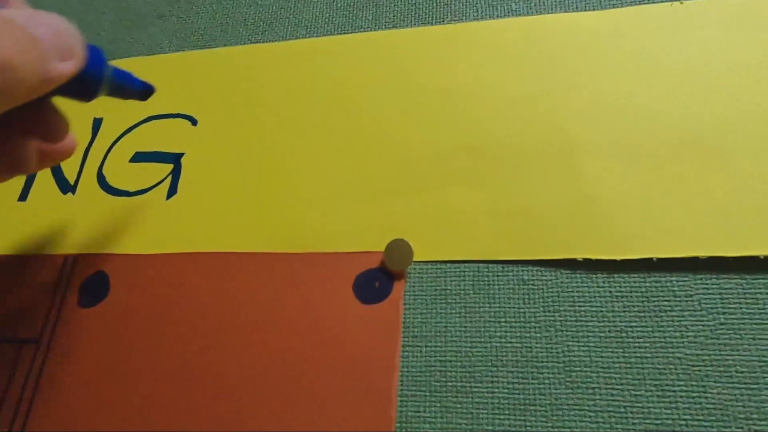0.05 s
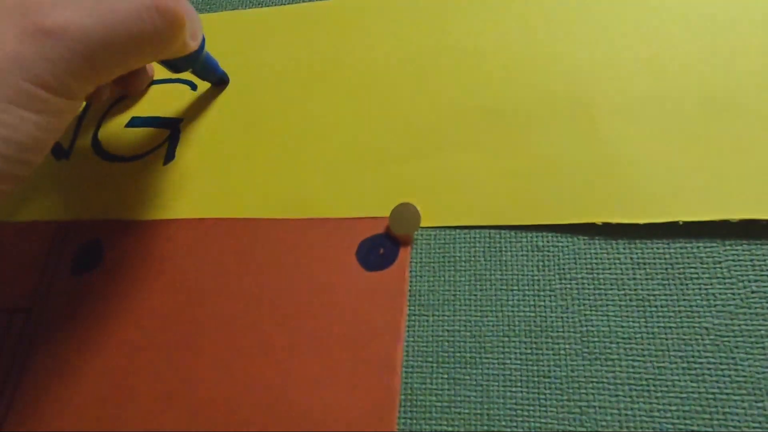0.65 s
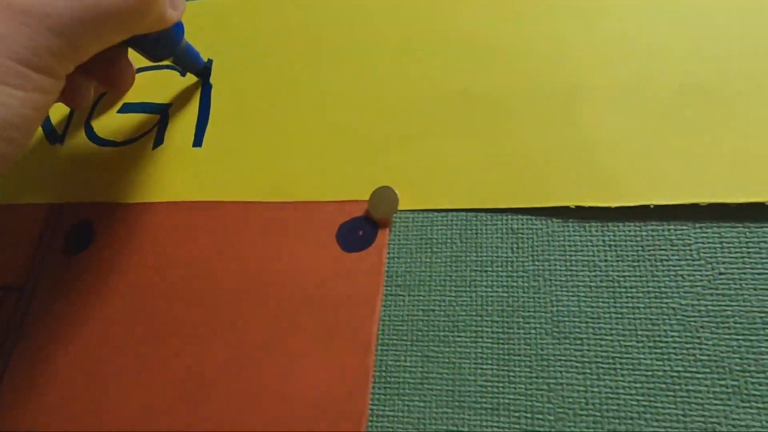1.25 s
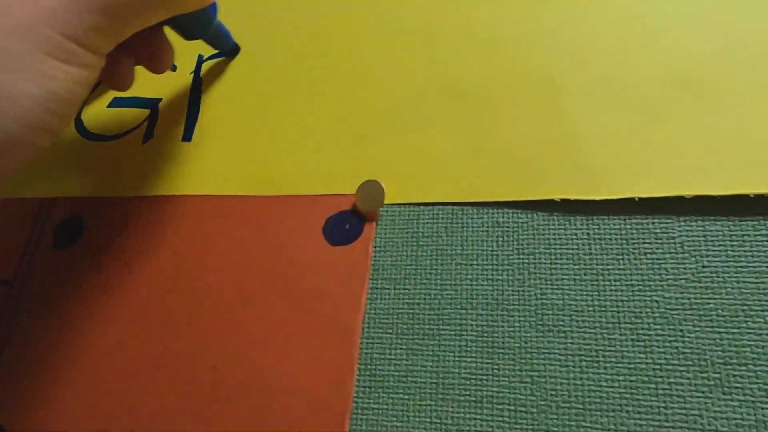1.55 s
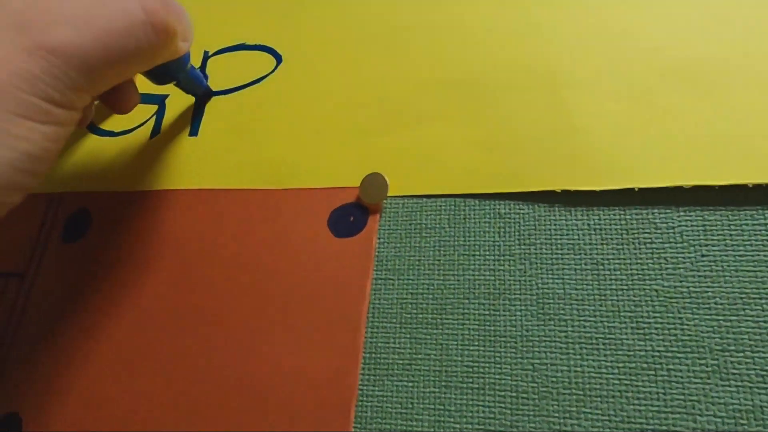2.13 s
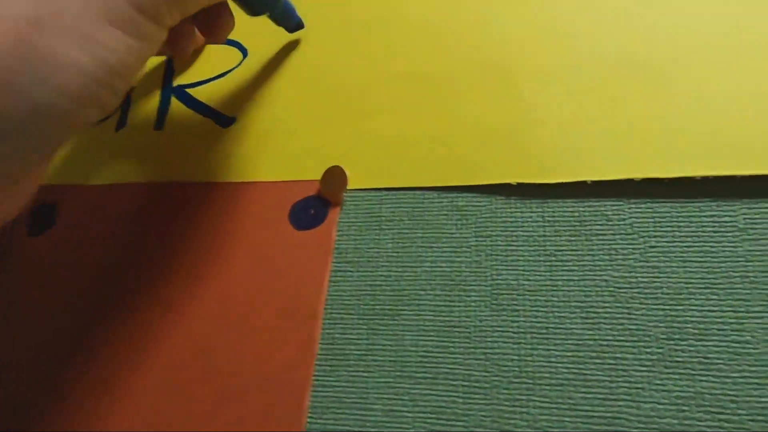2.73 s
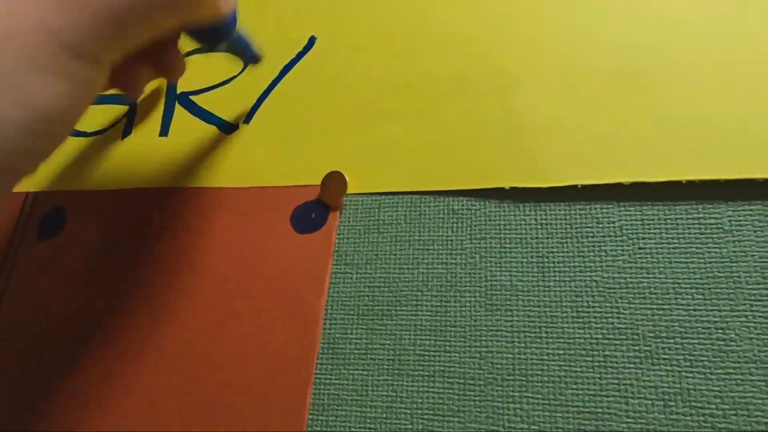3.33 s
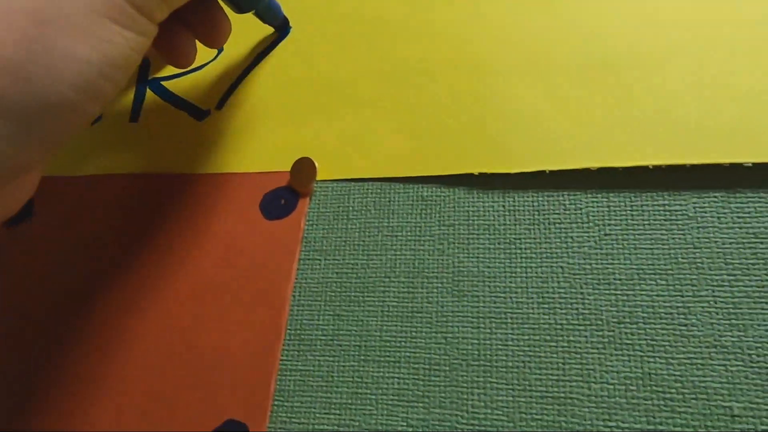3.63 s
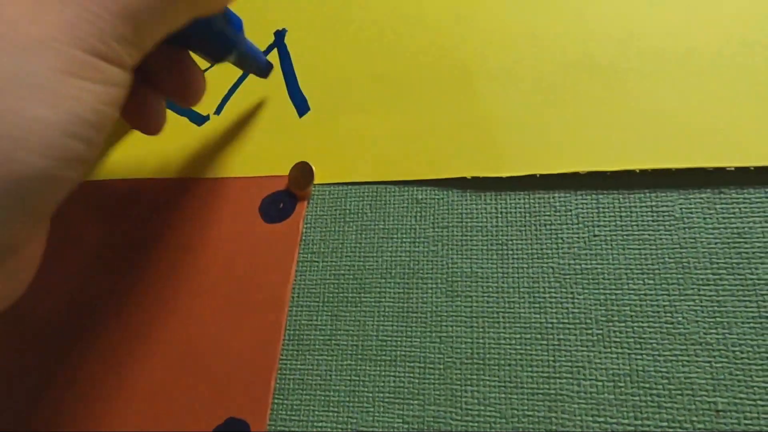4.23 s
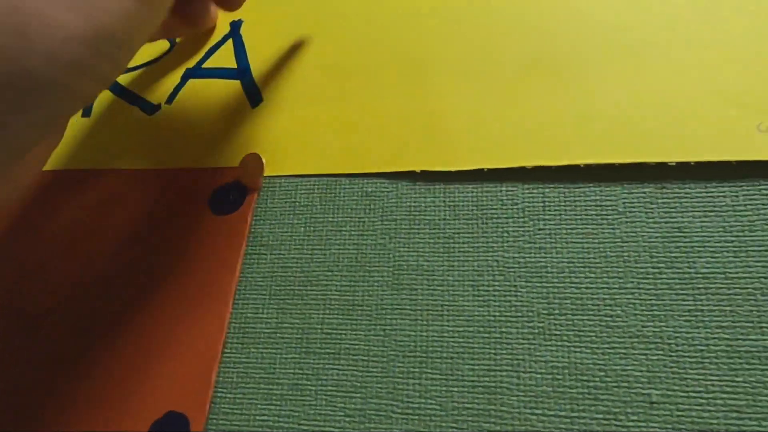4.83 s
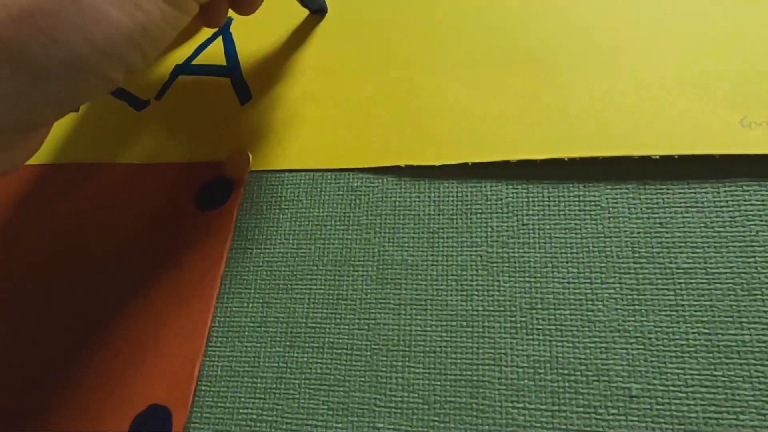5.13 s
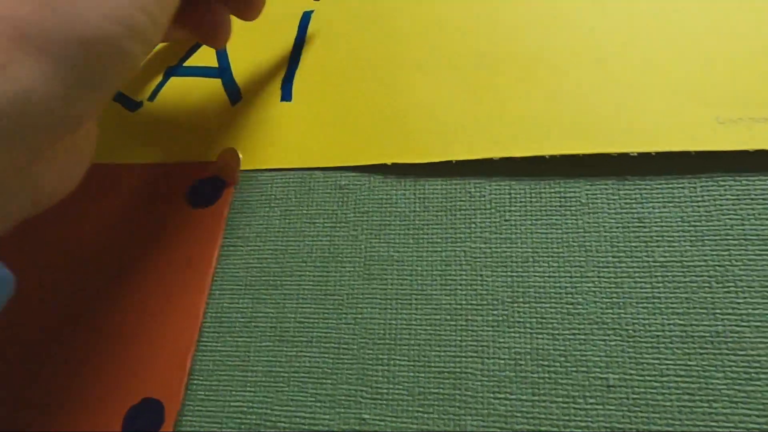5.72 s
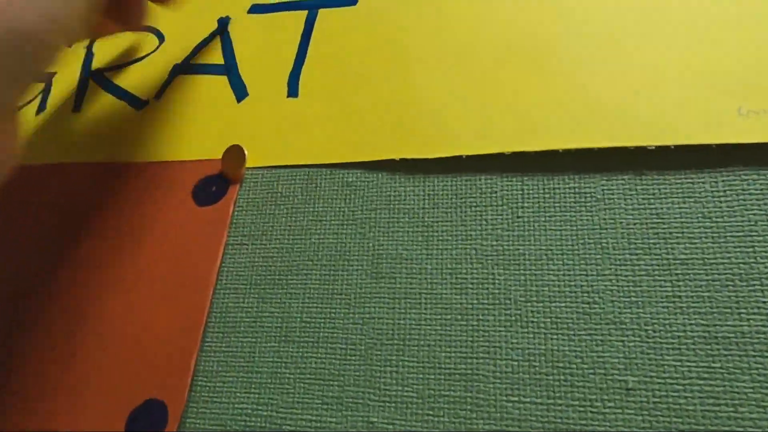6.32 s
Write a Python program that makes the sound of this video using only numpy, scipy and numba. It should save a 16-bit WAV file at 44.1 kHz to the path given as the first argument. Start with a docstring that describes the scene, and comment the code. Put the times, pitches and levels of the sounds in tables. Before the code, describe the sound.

A felt marker writes on card pinned to a cloth-covered board, close to the microphone. After a faint brush of hand and sleeve, nine short, high, scratchy strokes follow at an uneven pace, some of them squeaky. Soft, dull knocks sound as the pen lands, with tiny ticks in the pauses. A sleeve rubs near the end, and a low rumble fills the quiet room throughout.

```python
"""In a quiet room, a felt marker writes capital letters on card pinned to a cloth-covered board.
Each landing is an impact that excites the modes of the board. Each stroke is stick-slip friction:
a stream of tiny slips drives resonances that shift as the nib travels. Between strokes the nib ticks,
the hand brushes the card and a sleeve rustles, over a low room rumble."""
import sys
import numpy as np
from scipy import signal
from scipy.fft import rfft, irfft
from scipy.io import wavfile
from numba import njit

SR = 44100
rng = np.random.default_rng(int(sys.argv[2]) if len(sys.argv) > 2 else 0)


def generate_wav(signal):
    """Clip the signal to [-1, 1] and save it as 16-bit WAV at the path in sys.argv[1]."""
    frames = np.transpose(np.atleast_2d(signal))
    scaled = np.clip(frames, -1, 1) * 32767
    pcm = np.round(scaled).astype(np.int16)
    wavfile.write(sys.argv[1], SR, pcm)


N = 280917
TIME = np.arange(N) / SR
FREQS = np.maximum(np.fft.rfftfreq(N, 1 / SR), 1)

# Strokes of the nib. Motion: start t/s, end t/s, fastest point/share of stroke, slow start/dB, braking/dB;
# level/dB: main resonance, low resonance, its growth, high resonance, fixed ring, sheet rasp, fibre hiss,
#   squeak over rasp;
# f/Hz: low resonance at start, at end, main, high, antiresonance at start, at end, upper antiresonance
STROKE_TABLE = [ (0.749, 1.115, 0.51, 10.3, 28.4, -33, -40.5, -7.5, -33, -50, -42, -39.5, 6, 3910, 4000, 4800, 5940, 5330, 5630, 8300),
                (1.536, 1.866, 0.73, 12.8, 16, -34, -36, 10, -37.5, -44.5, -39, -39.5, -5, 2640, 3320, 4480, 6770, 3150, 3400, 6600),
                (1.865, 2.212, 0.62, 1.8, 35, -39.5, -37, 2, -43.5, -55, -39.5, -45, -0.5, 3600, 3740, 4700, 6800, 4300, 4320, 6600),
                (2.327, 2.591, 0.75, 12.7, 35, -27.5, -34, 4.5, -34.5, -61, -39, -35.5, 2.5, 3540, 3130, 4660, 7370, 4270, 4250, 7000),
                (3.088, 3.377, 0.7, 8.2, 44, -33, -37.5, 11, -36.5, -52, -40.5, -40, -6, 3580, 3420, 4870, 6980, 4120, 4700, 6900),
                (3.835, 4.157, 0.8, 9.7, 44, -33, -33.5, 6.5, -36.5, -44.5, -44, -36, -5, 4050, 3020, 5100, 6400, 3600, 3340, 7500),
                (4.594, 4.735, 0.38, 16, 17, -38, -40, 10, -39.5, -55, -40.5, -38, -5, 3350, 3320, 4750, 7660, 4020, 3950, 7150),
                (5.27, 5.562, 0.56, 9.1, 29, -36, -35, 9.5, -32, -45, -43, -36.5, -8, 4120, 3770, 5030, 5650, 3440, 3500, 6940),
                (6.107, 6.402, 0.43, 8.9, 15, -32, -42, -13, -42, -46.5, -38, -37.5, 1, 2960, 2820, 4440, 7160, 3800, 3630, 6900),
                ]
# Landings of the pen: t/s, strength/dB, time constant of the push/s, hand weight/dB, nib tick level/dB
LANDINGS = [(0.6797, -11, 0.00035, -8.5, -35), (1.4188, -12, 0.00023, -11, -49),
            (2.615, -28, 0.00039, -11, -52), (3.0102, -22, 0.00043, 13, -58),
            (3.7494, -10.5, 0.00032, 9.5, -37), (4.5331, -13.5, 0.00038, 12, -41),
            (5.2289, -9, 0.00061, 12.5, -34), (6.0324, -9, 0.00062, 14.5, -48)]
# Left-right coherence of nearby sources: f/Hz, coherence
NEAR_COHERENCE = [(100, .97), (1000, .92), (4000, .92), (8000, .85), (13000, .74)]


def from_db(db):
    """Amplitude ratio of a level in decibels."""
    return 10 ** (np.asarray(db) / 20)


def unit_power(x):
    """Normalisation to a mean square of one."""
    return x / np.sqrt(np.mean(x ** 2) + 1e-20)


def at_freqs(points):
    """Interpolation of (f/Hz, value) points on a logarithmic frequency axis."""
    hz, value = np.transpose(points)
    return np.interp(np.log(FREQS), np.log(hz), value)


def colour(x, spectrum):
    """Spectral shaping by (f/Hz, relative level/dB) points, at unit power."""
    return unit_power(irfft(rfft(x) * from_db(at_freqs(spectrum)), N))


def stereo_noise(coherence=NEAR_COHERENCE):
    """Partial coherence: left and right are the sum and difference of two white noises."""
    mid, side = rfft(rng.standard_normal((2, N)))
    alike = np.clip(at_freqs(coherence), 0, 1)
    return unit_power(irfft(np.sqrt(1 + alike) * mid + np.sqrt(1 - alike) * side * [[1], [-1]], N))


def drift(rate_hz):
    """Random modulation: low-passed noise of unit power."""
    return unit_power(irfft(rfft(rng.standard_normal(N)) / (1 + (FREQS / rate_hz) ** 2), N))


@njit
def resonator(x, angle, radius):
    """Two-pole resonance with a moving centre, given as an angle in radians per sample."""
    y = np.zeros_like(x)
    for c in range(2):
        for i in range(2, x.shape[1]):
            feedback = 2 * radius * np.cos(angle[i]) * y[c, i - 1] - radius * radius * y[c, i - 2]
            y[c, i] = x[c, i] - x[c, i - 2] + feedback
    return y


def resonate(x, hz, width_hz):
    """Two equal resonances in cascade give steep skirts; unit power."""
    angle = 2 * np.pi * hz / SR * np.ones(x.shape[1])
    radius = np.exp(-np.pi * width_hz / SR)
    return unit_power(resonator(resonator(np.ascontiguousarray(x), angle, radius), angle, radius))


def add(out, s, sound):
    """Superposition of a short sound starting at s seconds."""
    start = max(round(s * SR), 0)
    out[..., start:start + sound.shape[-1]] += sound[..., :max(N - start, 0)]


def background(rumble_db, air_db):
    """Ambient noise: a low rumble, modulated most in its deepest band, and a steady rush of air."""
    # Swells and lulls of the rumble: t/s, half-width/s, level change/dB
    swells = [(0.3, 0.45, 2.5), (2.2, 0.38, -5.5), (2.86, 0.077, 10.5)]
    # Spectra of the rumble and of the air: f/Hz, relative level/dB
    rumble_spectrum = [(18, -30), (28, 6), (39, 1), (53, 2.5), (80, 4), (100, -15), (122, -0.5), (160, -4),
                       (215, 2), (260, -6), (320, -11), (420, -18), (600, -21), (900, -27), (2000, -81),
                       (5000, -110)]
    air_spectrum = [(500, 2.5), (750, -13), (1000, 10.5), (1280, 11.5), (1700, 5), (2300, -1), (3200, -8),
                    (5000, -14.5), (7500, -14.5), (9000, -24), (12000, -28), (15500, -39)]
    # Left-right coherence of the room's noise: f/Hz, coherence
    coherence = [(60, .99), (300, .94), (1400, .87), (3100, .6), (7000, .3)]
    swell_db = sum(db * np.exp(-((TIME - s) / width_s) ** 2) for s, width_s, db in swells)
    noise = colour(stereo_noise(coherence), rumble_spectrum)
    deep = irfft(rfft(noise) / (1 + (FREQS / 203) ** 6), N)  # below 203 Hz
    rumble = from_db(swell_db) * deep + from_db(.45 * swell_db) * (noise - deep)
    waver_db = 1.9 * drift(rate_hz=10)
    air = colour(stereo_noise(coherence), air_spectrum)
    return from_db(rumble_db + waver_db) * rumble + from_db(air_db) * air


def reverberate(x, t60, wet_db, cutoff_hz):
    """Diffuse reverberation: a dull, exponentially decaying tail, independent on each side."""
    t = TIME[:SR]
    tail = rng.standard_normal((2, SR)) * from_db(-60 * t / t60) * (t > .005)
    tail = signal.sosfilt(signal.butter(2, cutoff_hz, fs=SR, output="sos"), tail)
    return x + from_db(wet_db) * signal.fftconvolve(x, unit_power(tail) / np.sqrt(SR), axes=1)[:, :N]


def casing_shadow(x):
    """Acoustic shadowing: a casing delays and shades the sound differently at its two microphones."""
    # Level difference: f/Hz, left minus right level/dB
    balance = [(200, -1), (1300, -.7), (2400, 1.2), (4400, -1.8), (8000, -2.2), (14000, -4.5)]
    # Phase difference: f/Hz, lag of the left side/rad
    lag = [(20, 0), (700, .05), (2000, .3), (3500, .6), (5600, .7), (7000, .35), (9000, .15), (15000, .2)]
    left_gain = from_db(at_freqs(balance) / 2) * np.exp(-.5j * at_freqs(lag))
    return irfft(rfft(x) * np.array([left_gain, 1 / left_gain]), N)


def sleeve():
    """Sliding friction of cloth on the board swells and dies away with each move of the arm."""
    # Moves of the arm: start t/s, end t/s, level/dB, change over the move/dB
    moves = [(0, 0.35, -38.5, -3.5), (5.922, 6.37, -30.5, 7)]
    # Spectrum of rubbing cloth: f/Hz, relative level/dB
    cloth_spectrum = [(25, -10), (40, -1), (90, 2.5), (140, 7.5), (250, -5.5), (400, -2.5), (540, -4),
                      (680, -18.5), (1100, -26), (2000, -29), (6000, -50), (14000, -80)]
    rise_db_per_s, fall_db_per_s = 110, 43
    drag = 0
    for start, end, db, change_db in moves:
        fade_db = rise_db_per_s * np.maximum(start - TIME, 0) + fall_db_per_s * np.maximum(TIME - end, 0)
        drag += from_db(db + change_db * np.interp(TIME, [start, end], [-.5, .5]) - fade_db)
    flutter = from_db(2.2 * drift(rate_hz=7))
    return drag * flutter * colour(stereo_noise(), cloth_spectrum)


def contact_noise(friction, s, length_s, hz, width_hz, hiss_db):
    """A short stretch of friction noise: a broad resonance over a plain hiss, at unit power."""
    piece = friction[:, round(s * SR):][:, :round(length_s * SR)]
    return unit_power(resonate(piece, hz, width_hz) + from_db(hiss_db) * piece)


def hand_brushes(friction):
    """Sliding friction of skin on card gives short, fading bands of noise."""
    # Slides of the hand: t/s, duration/s, level/dB, centre f/Hz, change over the slide/dB
    slides = [(0, 0.13, -54.5, 4900, -6), (0.111, 0.37, -44.5, 1560, -14), (0.12, 0.31, -58.5, 3960, -6.5),
              (2.772, 0.07, -54.5, 5500, -11.5), (2.783, 0.078, -49, 1400, -4.5),
              (2.883, 0.058, -54.5, 4730, -9), (2.974, 0.043, -38, 6650, -15),
              (4.959, 0.12, -48.5, 5200, -14.5), (5.816, 0.06, -57.5, 5800, -7)]
    out = np.zeros((2, N))
    for s, length_s, db, hz, fade_db in slides:
        rub = contact_noise(friction, s, length_s, hz, width_hz=.7 * hz, hiss_db=-9)
        along = np.linspace(0, 1, rub.shape[1])
        add(out, s, rub * from_db(db + fade_db * along) * signal.windows.tukey(len(along), .15))
    return out


def ticks(friction):
    """Damped transients: the nib grazes, touches and catches, and the fingers change their grip."""
    # The nib unsticks or the barrel clicks in the fingers: t/s, relative level/dB, centre f/Hz, T60/s
    lone_ticks = [(0.1202, -25.5, 3200, 0.02), (0.3303, -26, 7700, 0.035), (1.139, -29, 6330, 0.048),
                  (1.2846, -36.5, 7400, 0.028), (2.618, -26.5, 6140, 0.059), (2.757, -34.5, 5000, 0.23),
                  (3.405, -34, 7250, 0.08), (3.6034, -23.5, 4560, 0.0083), (3.642, -45, 6160, 0.05),
                  (4.77, -34.5, 7640, 0.02), (4.9383, -27, 3860, 0.13), (5.594, -41.5, 7100, 0.036),
                  (5.8015, -27.5, 5550, 0.017), (6.01, -36.5, 7160, 0.081)]
    grazes = [(s - .016, -46, 6800, .044) for s, *_ in LANDINGS]
    touches = [(s - .002, tick_db, 6000, .016) for s, *_, tick_db in LANDINGS]
    catches = [(s + .0073, -33.5, 4200, .033) for s, *_ in STROKE_TABLE]
    regrip = [(4.215 + .041 * (k + .15 * late), -41 + 2 * loud, 7100, .019)
              for k, (late, loud) in enumerate(rng.standard_normal((5, 2)))]
    out = np.zeros((2, N))
    for s, db, hz, t60 in lone_ticks + grazes + touches + catches + regrip:
        burst = contact_noise(friction, s, .11, hz, width_hz=6500, hiss_db=0)
        add(out, s, burst * from_db(db - 9.5 - 60 * TIME[:burst.shape[1]] / t60))
    return out


def board_knocks():
    """Impact excitation: a soft push rings the board's modes; the hand's weight feeds the lowest."""
    # Modes of the board: f/Hz, level/dB, T60/s
    modes = [(55, -36.5, 1), (81, -27.5, 1), (120.4, -19, 0.5), (148.3, -18, 0.22), (165, -31, 0.77),
             (177.3, -4, 0.16), (208.6, -13, 0.77), (223.2, -1, 0.27), (305.6, -8.5, 0.15), (342, -45, .04),
             (476, -22, 0.16), (568, -33, 0.12), (727, -25.5, 0.064)]
    heavy_below_hz, slap_t60, shudder_t60 = 244, .15, .85
    frame = colour(rng.standard_normal(N), [
        (30, -35), (56, 8.5), (80, 5), (100, -14), (125, 6.5), (220, -6), (320, -10), (450, -17),
        (600, -53), (750, -49), (2000, -74), (5000, -110)])
    card = colour(rng.standard_normal(N), [
        (200, 4), (450, 9), (800, -47), (1500, -13), (3000, -36.5), (8000, -40), (15000, -71)])
    out, t = np.zeros(N), TIME[:SR]
    for s, db, push_s, weight_db, _ in LANDINGS:
        push = t ** 2 * np.exp(-t / push_s)
        ring = 0
        for hz, mode_db, t60 in modes:
            boost_db = weight_db * np.clip(np.log2(heavy_below_hz / hz), 0, 1)
            ring += from_db(mode_db + boost_db - 60 * t / t60) * np.sin(2 * np.pi * hz * t)
        add(out, s, -from_db(db) * signal.fftconvolve(ring, push / push.sum())[:SR])
        # the loose card slaps its backing, then the frame answers with a diffuse shudder
        since = np.maximum(TIME - s, 0)
        out += card * from_db(db - 27 - .47 * weight_db - 60 * since / slap_t60) * (since > 0)
        build_up = 1 - np.exp(-since / .026)
        out += frame * from_db(db - 13.5 + .31 * weight_db - 60 * since / shudder_t60) * build_up
    return signal.sosfilt(signal.butter(2, 50, "high", fs=SR, output="sos"), out)


def edge_echoes(x, strength, shortest_s, longest_s, wander, count):
    """Comb filtering: waves reflect from the card's edges by paths whose lengths wander."""
    out = x.copy()
    for lag in np.geomspace(shortest_s, longest_s, count):
        delayed_time = TIME - lag * (1 + wander * drift(rate_hz=.97))
        out += strength * np.array([np.interp(delayed_time, TIME, side) for side in x])
    return out / np.sqrt(1 + count * strength ** 2)


def antiresonance(x, hz, width_hz, depth):
    """An antiresonance weakens the band in which the card hardly moves under the nib."""
    radius = np.exp(-np.pi * width_hz / SR)
    return x - depth * (1 - radius ** 2) / 2 * resonator(x, 2 * np.pi * hz / SR, radius)


def slip_resonance(hz, squeak_db, rasp_width_hz, squeak_width_hz):
    """Mode locking: loose slips excite a broad resonance; locked to it, they give a narrow squeak."""
    rasp = resonate(stereo_noise(), hz, rasp_width_hz)
    squeak = resonate(stereo_noise(), hz, squeak_width_hz)
    return (rasp + from_db(squeak_db) * squeak) / np.hypot(1, from_db(squeak_db))


def stroke_speed(along, fastest, slow_db, brake_db):
    """Sliding speed in dB relative to its peak: the nib gathers pace, then brakes late."""
    before = np.maximum(1 - along / fastest, 0)
    after = np.maximum(along - fastest, 0) / (1 - fastest)
    return -slow_db * before ** 1.55 - brake_db * after ** 4.6


def marker_strokes():
    """Stick-slip friction of felt on paper rings nib, barrel and card, louder and brighter with speed."""
    # Spectra of the rasping card and of its snapping fibres: f/Hz, relative level/dB
    sheet_spectrum = [(350, 5.5), (540, -4.5), (650, -8.5), (770, 3.5), (930, 0.5), (1150, 2), (1450, 1.5),
                      (1720, 1.5), (2050, -5.5), (2550, -1), (3300, -49)]
    fibre_spectrum = [(2100, -5.5), (2700, 4), (3300, 3), (5500, 0.5), (7700, 3.5), (9000, -9.5),
                      (10500, -8.5), (12300, -11), (14000, -23), (15600, -45)]
    attack_s, release_s = .023, .012
    rows = np.array(STROKE_TABLE)
    current = np.maximum(np.searchsorted(rows[:, 0], TIME) - 1, 0)
    (start, end, fastest, slow_db, brake_db,
     main_db, low_db, growth_db, high_db, ring_db, sheet_db, fibres_db, squeak_db,
     low_start_hz, low_end_hz, main_hz, high_hz,
     notch_start_hz, notch_end_hz, upper_notch_hz) = rows[current].T
    along = np.clip((TIME - start) / (end - start), 0, 1)
    speed_db = stroke_speed(along, fastest, slow_db, brake_db)
    place = -.5 * np.cos(np.pi * along)  # the nib's position, from -1/2 to 1/2
    contact = sum(np.interp(TIME, [s, s + attack_s, e, e + release_s], [0, 1, 1, 0])
                  for s, e in rows[:, :2])
    grip = from_db(.86 * drift(rate_hz=710) + 1.1 * drift(rate_hz=33)) * np.minimum(contact, 1)
    # along a stroke the low resonance glides, the upper two sink and the high one fades
    low_hz = low_start_hz + (low_end_hz - low_start_hz) * (place + .5)
    low = slip_resonance(low_hz, squeak_db, rasp_width_hz=1150, squeak_width_hz=560)
    main = slip_resonance(main_hz * (1 - .1 * place), squeak_db, rasp_width_hz=1800, squeak_width_hz=780)
    high = slip_resonance(high_hz * (1 - .05 * place), squeak_db,
                          rasp_width_hz=2300, squeak_width_hz=1000)
    low *= from_db(low_db + .48 * speed_db + growth_db * (along - .5))
    main *= from_db(main_db + speed_db)
    high *= from_db(high_db + speed_db - 4 * along)
    # one ring keeps its pitch and builds up along each stroke
    ring = resonate(stereo_noise(), hz=2885, width_hz=640)
    ring *= from_db(ring_db + .48 * speed_db + 17.5 * (along - .5))
    sheet = from_db(sheet_db + .13 * speed_db) * colour(stereo_noise(), sheet_spectrum)
    # snapping fibres add a grainy hiss, weaker at the slow ends of a stroke
    grain_db = .94 * drift(rate_hz=1500)
    fibres = colour(stereo_noise(), fibre_spectrum)
    fibres *= from_db(fibres_db + .67 * speed_db - 1.5 * (2 * along - 1) ** 2 + grain_db)
    scrape = grip * (low + main + high + ring + sheet + fibres)
    notch_hz = notch_start_hz + (notch_end_hz - notch_start_hz) * (place + .5)
    scrape = antiresonance(scrape, notch_hz, width_hz=420, depth=.7)
    scrape = antiresonance(scrape, upper_notch_hz, width_hz=410, depth=.56)
    scrape = antiresonance(scrape, np.full(N, 8560), width_hz=2100, depth=.23)  # common to all strokes
    return edge_echoes(scrape, strength=.22, shortest_s=.0017, longest_s=.006, wander=.025, count=4)


def scene():
    """Superposition of the nearby pen, hand and board on the ambient noise of the room."""
    strokes = marker_strokes()
    friction = colour(stereo_noise(), [
        (200, -7), (1000, -4), (4000, 12), (7800, 1.5), (9000, -1.5), (11500, -6), (15500, -26)])
    writing = strokes + ticks(friction) + hand_brushes(friction)
    writing = reverberate(writing, t60=.48, wet_db=-22, cutoff_hz=7500)
    nearby = casing_shadow(writing + board_knocks() + sleeve())
    return nearby + background(rumble_db=-41.5, air_db=-53.5)


def record(dry):
    """Band limiting: a steep low-pass filter cuts the treble above 15.7 kHz."""
    return signal.sosfilt(signal.ellip(10, .1, 90, 15700, fs=SR, output="sos"), dry)


dry = scene()
out = record(dry)
generate_wav(out)
```